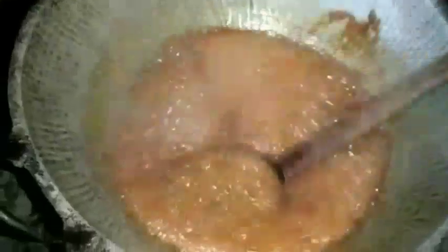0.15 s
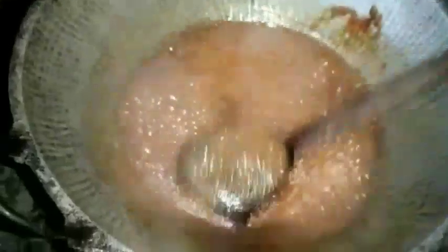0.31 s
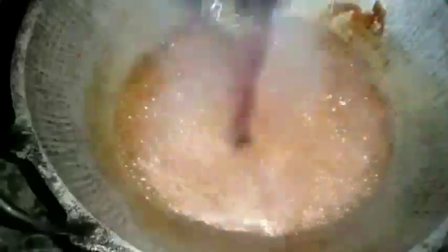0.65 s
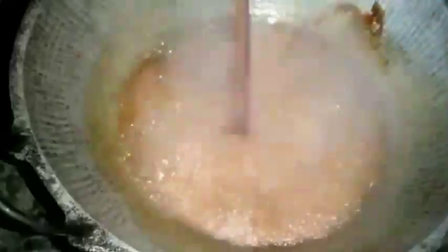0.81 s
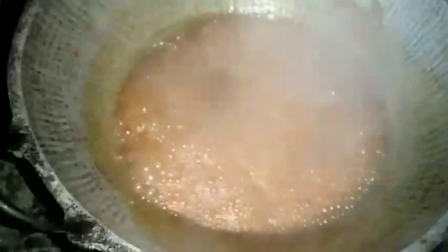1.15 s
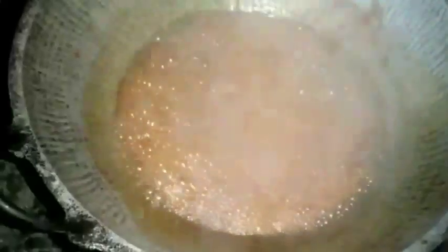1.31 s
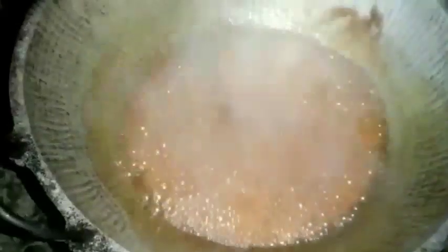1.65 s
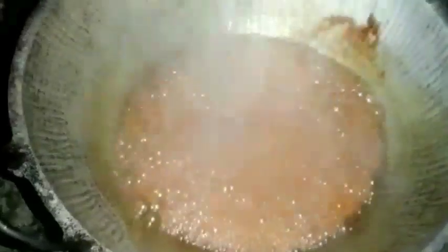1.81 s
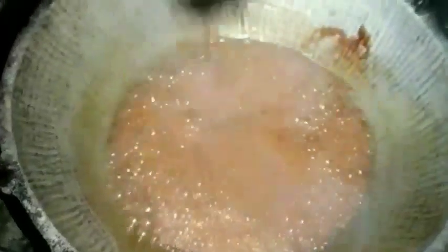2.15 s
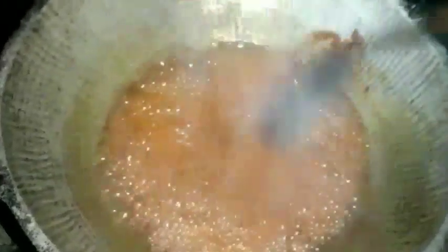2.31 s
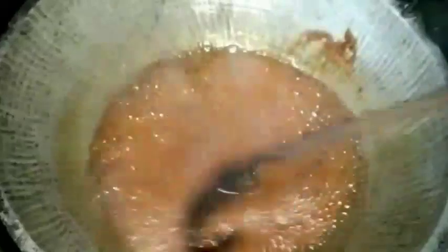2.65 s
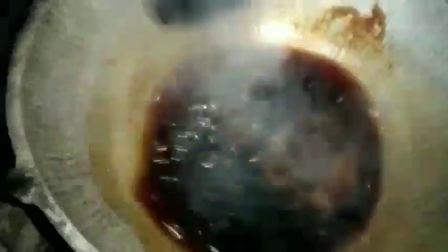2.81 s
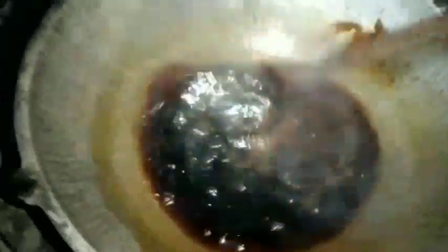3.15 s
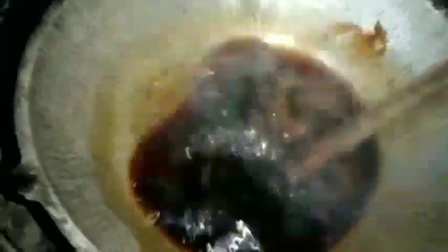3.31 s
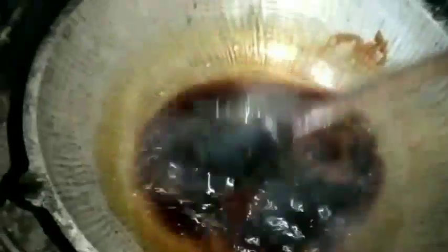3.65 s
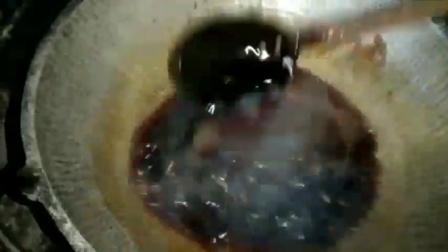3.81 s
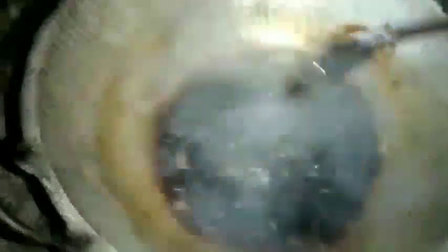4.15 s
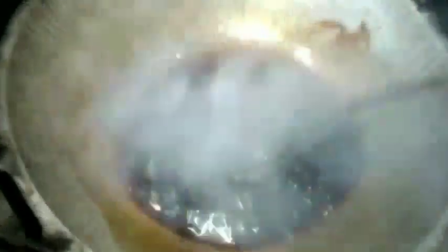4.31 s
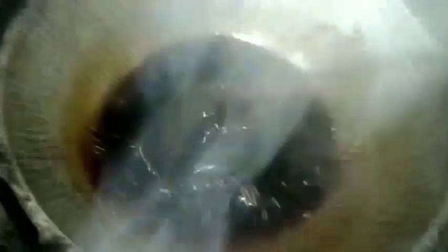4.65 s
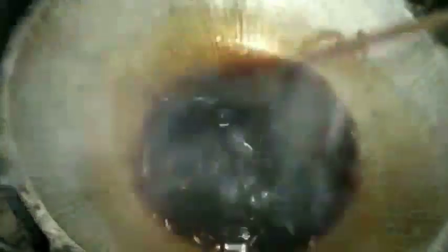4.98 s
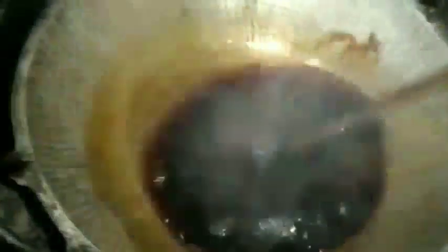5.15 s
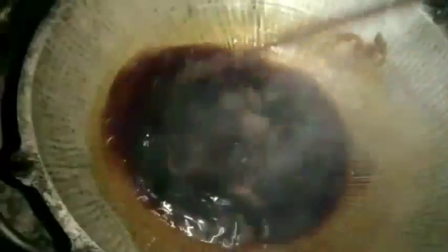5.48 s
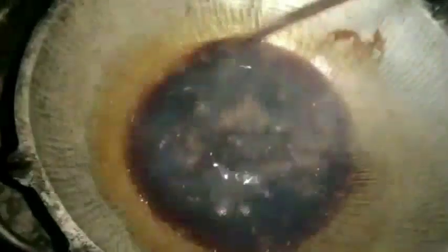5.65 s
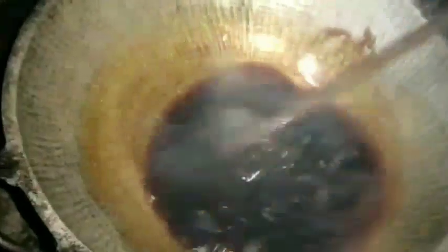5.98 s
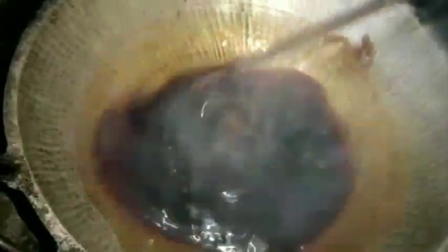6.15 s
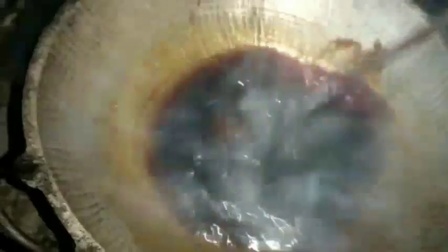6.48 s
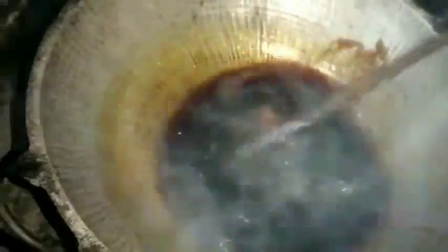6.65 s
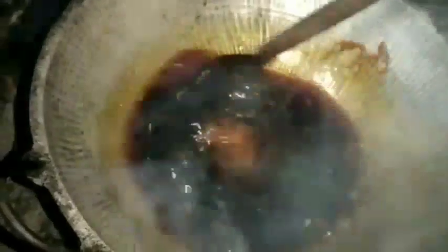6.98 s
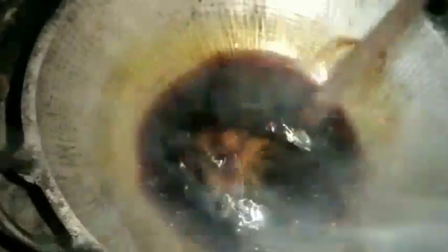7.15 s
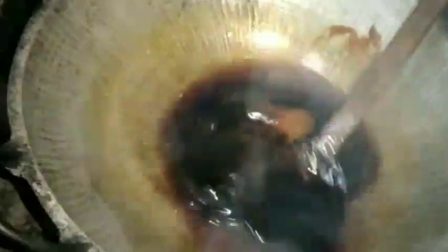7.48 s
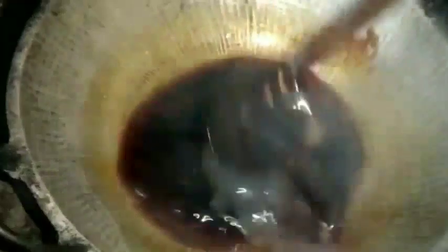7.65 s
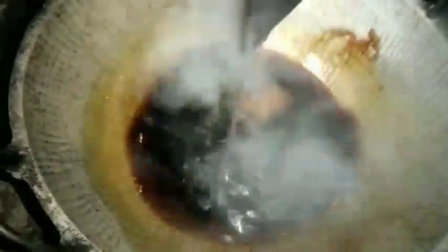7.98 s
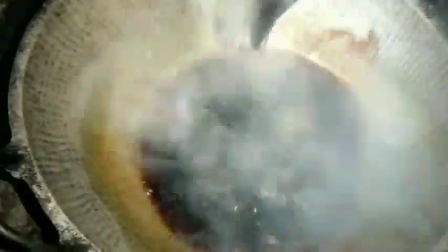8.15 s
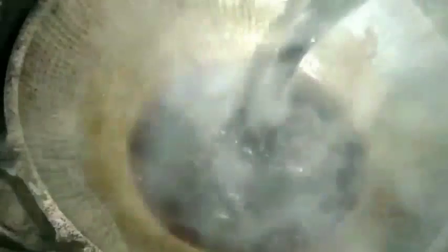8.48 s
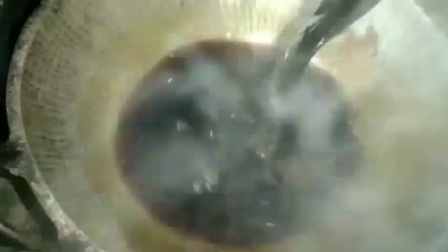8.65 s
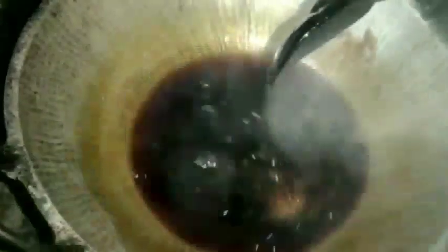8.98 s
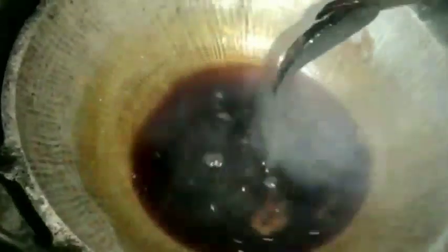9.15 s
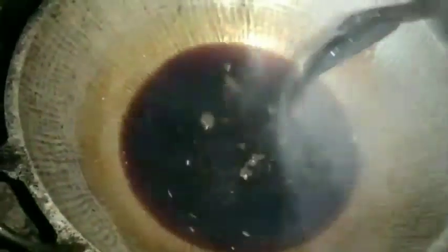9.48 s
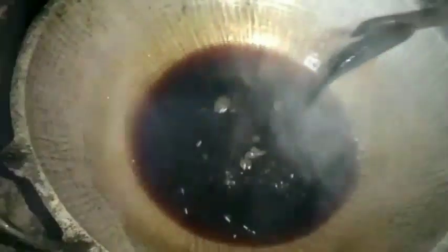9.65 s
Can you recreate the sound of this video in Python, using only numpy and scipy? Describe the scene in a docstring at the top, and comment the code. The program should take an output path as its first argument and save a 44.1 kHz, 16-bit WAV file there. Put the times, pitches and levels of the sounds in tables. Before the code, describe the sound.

Close in a small kitchen with short hard reflections, over a faint low rush. From 0 s a ladle rubs briefly round a steel wok while thick sugar foam fizzes and murmurs. At 0.8-1.4 s poured syrup gurgles and patters in droplets; the foam then seethes alone, thickening slightly. At 2.5 s a bright clank starts a scrape, cut off at 3 s by a tiny near-silent gap. From 3.1 s thin caramel: damped knocks, a splash with plops and steam hisses around 3.4-4.2 s, then a loud dull clank at 4.4 s. Stirring rasps and grates with sizzling, sputters and soft knocks until about 7.3 s, including a hard knock at 6.35 s. At 7.7-8.4 s liquid falls back in splashes, ringing plops and spitting; small hisses dwindle by 9 s. Near quiet follows, with a little drip at 9.25 s and faint metal ticks at 9.4 s.

```python
"""First comes foam: sugar seethes and fizzes in a hot steel wok in a small kitchen, many tiny bubbles bursting.
A metal ladle knocks, scrapes round the bowl in rubbing grains and pours syrup back in a gurgling thread.
Just before three seconds the scene cuts from the foam to a later moment, where the ladle stirs thin dark caramel,
which splashes, drips and sizzles as ringing bubbles and noise jets. The liquid damps the wok: every blow is short.
A low rush of noise lies underneath; hard walls answer 5 ms later, and the microphone rounds off the peaks."""
import sys
import numpy as np
from scipy import signal
from scipy.fft import rfft, irfft
from scipy.io import wavfile
from scipy.ndimage import uniform_filter1d, map_coordinates

SR = 44100
rng = np.random.default_rng(int(sys.argv[2]) if len(sys.argv) > 2 else 0)


def transcribe(u):
    """Save the signal u as a 16-bit wav file named by the first command-line argument.

    u: samples, shape (n,) or (channels, n), limited to [-1, 1]; the rate is SR.
    q: integer samples, one column per channel.
    """
    v = np.clip(np.atleast_2d(u).T, -1, 1)
    q = np.round(v * 32767).astype(np.int16)
    wavfile.write(sys.argv[1], SR, q)


N = 432180
CUT_S = 2.987  # from the foam to the thin caramel
TOP_HZ = 15500  # band limit of the microphone


def amp(db):
    """Decibels to gain."""
    return 10 ** (np.asarray(db) / 20)


def unit(x):
    """Scale to rms 1."""
    return x / np.sqrt(np.mean(x ** 2) + 1e-20)


def along(points, hz):
    """Read (f/Hz, value) points on a log frequency axis."""
    f, v = np.transpose(points)
    return np.interp(np.log(hz + 1), np.log(f + 1), v)


def add(track, s, x):
    """Mix x into the track at s seconds."""
    part = track[round(s * SR):][:len(x)]
    part += x[:len(part)]


def decay(t, t60):
    """Fall 60 dB in t60 seconds."""
    return np.exp(-np.log(1000) * t / t60)


def envelope(attack, held, release):
    """Rise over attack, stay until held after the start, then fall 60 dB in release."""
    t = np.arange(SR * 3 // 2) / SR
    return np.clip(t / attack, 0, 1) * decay(np.maximum(t - held, 0), release)


def swell(start, attack, held, release):
    """One envelope placed in the scene."""
    out = np.zeros(N)
    add(out, start, envelope(attack, held, release))
    return out


def wobble(rate):
    """A smooth random curve with rate knots a second."""
    knots = rng.standard_normal(int(N * rate / SR) + 4)
    return map_coordinates(knots, [np.arange(N) * rate / SR])


def colour(x, points, size=4096):
    """Causal (minimum-phase) filter with the gain of (f/Hz, level/dB) points."""
    gain = amp(along(points, np.fft.rfftfreq(size, 1 / SR)))
    # folding the cepstrum forward puts the whole response after the impulse
    cepstrum = irfft(np.log(gain))
    cepstrum[1:size // 2] *= 2
    cepstrum[size // 2 + 1:] = 0
    response = irfft(np.exp(rfft(cepstrum)))
    return signal.fftconvolve(x, response)[:len(x)]


def patchy(x, depth_db, wide_hz, lasting, size=512):
    """The level flickers at random in patches of time and frequency; rms 1."""
    hz, t, z = signal.stft(x, SR, nperseg=size)
    grid = np.meshgrid(hz / wide_hz, t / lasting, indexing="ij")
    field = map_coordinates(rng.standard_normal((256, 512)), grid, order=1, mode="mirror")
    patched = z * amp(depth_db * unit(field))
    return unit(signal.istft(patched, nperseg=size)[1][:N])


def grains(rate, spread_db):
    """Random tiny impulses of uneven size, rate a second on average; rms 1."""
    size = amp(spread_db * np.minimum(rng.standard_normal(N), 2))
    struck = rng.random(N) < rate / SR
    return unit(struck * size * rng.choice([-1, 1], N))


def excite(impulses, ring):
    """Every impulse sets off the same ring."""
    return signal.fftconvolve(impulses, ring)[:N]


def bubble(t, hz, cycles, rise):
    """A bubble rings for a few cycles; its pitch rises by the share rise as it surfaces."""
    life = cycles / hz
    return np.sin(2 * np.pi * hz * (t + rise * t * t / (2 * life))) * decay(t, life)


def blips(count, hz, spread, cycles, spread_db, until=N / SR):
    """Small bubbles surface at random, each with its own pitch (spread in log units) and size."""
    t = np.arange(SR // 40) / SR
    start = (rng.random((count, 1)) * until * SR).astype(int)
    pitch, size = np.clip(rng.standard_normal((2, count, 1)), -2, 1.8)
    soft_start = (1 - np.exp(-t * hz * 12 / cycles)) ** 2
    rings = amp(spread_db * size) * soft_start * bubble(t, hz * np.exp(spread * pitch), cycles, rise=0)
    places = (start + np.arange(len(t))).ravel()
    out = np.bincount(places, rings.ravel(), minlength=N)[:N]
    # rms 1 over the stretch that holds bubbles
    return unit(out) * np.sqrt(until * SR / N)


SPLUTTER_SPREAD = 0.22  # pitch spread in log units


def splutter(length, hz, cycles, count):
    """A clump of tiny bubbles about one pitch; rms 1 over its length, centred a quarter second in."""
    out, t = np.zeros(SR // 2), np.arange(SR // 30) / SR
    soft_start = (1 - np.exp(-t / .0004)) ** 2
    for when, pitch, size in np.clip(rng.standard_normal((count, 3)), -2, 2):
        ring = bubble(t, min(hz * np.exp(SPLUTTER_SPREAD * pitch), TOP_HZ), cycles, rise=0)
        add(out, max(1 / 4 + when * length / 2, 0), amp(3 * size) * soft_start * ring)
    return out / np.sqrt(np.sum(out ** 2) / (2 * length * SR))


# Colour of the low rush: (f/Hz, level/dB)
RUSH_COLOUR = [(25, -28), (50, -17), (95, -1), (150, 0), (210, -12), (325, 4.5), (410, -4.5), (510, -25),
               (1500, -28.5), (8000, -39), (15000, -45.5)]
DRONE_DB = -66  # rms before the sway and the fade
DRONE_FADE_S, DRONE_FADE_DB_PER_S = 8.11, 6.5  # the drone sinks towards the end


def drone():
    """Background: a low, unsteady rush of filtered noise under the wok."""
    sway = amp(1.8 * wobble(14))
    fading = np.maximum(np.arange(N) / SR - DRONE_FADE_S, 0)
    rush = unit(colour(rng.standard_normal(N), RUSH_COLOUR))
    return rush * amp(DRONE_DB - DRONE_FADE_DB_PER_S * fading) * sway


# Reverberation of the small kitchen: (f/Hz, t60/s)
ROOM_DECAY = [(200, 0.45), (1000, 0.087), (4000, 0.15), (12000, 0.2)]


def kitchen(x):
    """Hard walls answer 5 ms late with a short noise tail that decays at its own pace in each band."""
    hz, t, z = signal.stft(rng.standard_normal(SR // 2), SR, nperseg=256)
    dying = z * decay(t, along(ROOM_DECAY, hz)[:, None])
    tail = signal.istft(dying, SR, nperseg=256)[1]
    delayed = np.pad(x, (SR // 200, 0))
    return signal.fftconvolve(delayed, tail / np.linalg.norm(tail))[:N]


# Bubbles in thick foam: (f/Hz, level/dB)
SEETHE_COLOUR = [(30, -35.5), (85, -14), (160, 0.5), (340, 0.5), (720, -1), (1050, 1), (1450, 3),
                 (2200, -4.5), (2600, -18), (3100, -32), (8000, -54)]
SEETHE_DB, SEETHE_DB_PER_S = -60.5, 1.62  # level at the start before unevenness, growth as foam thickens
BLUB_HZ, BLUB_DB = 1323, -11  # single larger bubbles: middle pitch, level against the seething
POUR_SEETHE_DB, POUR_FIZZ_DB = -62, -65.5  # what the pour stirs up, before unevenness


def seething(clock, pour):
    """Thick foam murmurs: dense filtered bursts with single larger bubbles ringing among them."""
    gain = np.hypot(amp(SEETHE_DB + SEETHE_DB_PER_S * clock), amp(POUR_SEETHE_DB) * pour)
    seethe = patchy(colour(grains(rate=4000, spread_db=4), SEETHE_COLOUR), 1.5, wide_hz=140, lasting=.08)
    blubs = blips(count=330, hz=BLUB_HZ, spread=.36, cycles=24, spread_db=3.5, until=CUT_S)
    return (seethe + amp(BLUB_DB) * blubs) * gain * amp(0.41 * wobble(8.2))


# The finest bubbles: (f/Hz, level/dB)
FIZZ_COLOUR = [(2000, -36), (3300, -27.5), (3780, -0.5), (4150, -1), (4700, 2.5), (6000, 0.5), (7700, -5),
               (8800, -26.5), (15000, -22.5)]
FIZZ_DB, FIZZ_DB_PER_S = -70.5, -1  # level at the start before singing and unevenness, slow fall
SING_HZ, SING_DB = 3720, -5.5  # the fizz keeps one mode of the wok ringing; level against the fizz


def fizzing(clock, pour):
    """The finest bubbles hiss in flickering bands and keep one mode of the wok singing."""
    gain = np.hypot(amp(FIZZ_DB + FIZZ_DB_PER_S * clock), amp(POUR_FIZZ_DB) * pour)
    bursts = colour(grains(rate=4000, spread_db=3), FIZZ_COLOUR)
    fizz = patchy(bursts, depth_db=4.5, wide_hz=80, lasting=.04, size=1024)
    t = np.arange(SR // 20) / SR
    mode = np.sin(2 * np.pi * SING_HZ * t) * t * decay(t, .022)
    singing = unit(excite(rng.standard_normal(N), mode))
    return (fizz + amp(SING_DB) * singing) * gain * amp(2.5 * wobble(25.3))


# the thread of syrup poured back
POUR_S, POUR_ATTACK_S, POUR_HELD_S, POUR_RELEASE_S = 0.775, 0.087, 0.43, 0.37
GURGLE_HELD_S, GURGLE_DB = .3, -58.5  # the thread is thick enough to trap air
PATTER_S, PATTER_HELD_S, PATTER_DB = 0.99, 0.051, -52  # the thread breaks into droplets


def poured_thread():
    """The thread gurgles as trapped air rings at about 1 kHz, then patters as droplets."""
    t = np.arange(SR // 20) / SR
    cavity = np.sin(2 * np.pi * 1010 * t) * decay(t, .02)
    gurgle = unit(excite(grains(rate=160, spread_db=3), cavity))
    droplets = grains(rate=300, spread_db=5)
    patter = unit(colour(droplets, [(900, -20), (2000, 0), (7500, -2), (9000, -22)]))
    gurgling = swell(POUR_S, POUR_ATTACK_S, GURGLE_HELD_S, POUR_RELEASE_S)
    pattering = swell(PATTER_S, POUR_ATTACK_S, PATTER_HELD_S, POUR_RELEASE_S)
    return amp(GURGLE_DB) * gurgle * gurgling + amp(PATTER_DB) * patter * pattering


# fine blisters multiply as the foam heats: middle pitch, level at the start, growth
BLISTER_HZ, BLISTER_DB, BLISTER_DB_PER_S = 2710, -86.5, 8


def foam():
    """Many small bubbles burst in the thick sugar; the poured thread sounds in it and stirs it up."""
    clock = np.arange(N) / SR
    pour = swell(POUR_S, POUR_ATTACK_S, POUR_HELD_S, POUR_RELEASE_S)
    blisters = blips(count=700, hz=BLISTER_HZ, spread=.22, cycles=70, spread_db=3.5, until=CUT_S)
    growing = blisters * amp(BLISTER_DB + BLISTER_DB_PER_S * clock)
    return seething(clock, pour) + fizzing(clock, pour) + growing + poured_thread()


# Laps up the wall, levels before the mix of each layer: (start t/s, held t/s, slosh level/dB, spray level/dB)
WALL_LAPS = [(3.45, 0.077, -55, -73.5), (3.749, 0.13, -57, -66), (4.132, 0.12, -57, -70.5),
             (7.834, 0.026, -49.5, -57), (7.93, 0.22, -61.5, -69), (8.206, 0.04, -63.5, -62.5),
             (8.37, 0.061, -56.5, -90), (8.49, 0.073, -81.5, -67.5), (8.66, 0.033, -75, -72),
             (8.769, 0.025, -61, -60.5)]
# Caramel lapping: (f/Hz, level/dB)
SLOSH_COLOUR = [(400, -19), (800, -1), (1000, -31.5), (1400, 18.5), (2300, 20.5), (3000, 17.5), (5000, -31)]
# Caramel spitting: (f/Hz, level/dB)
SPRAY_COLOUR = [(2800, -29.5), (4000, -1), (6000, -4), (8000, 9), (9500, -7.5), (11500, 5.5),
                (15000, -11.5)]
LAP_ATTACK_S, LAP_RELEASE_S = 0.015, 0.26  # a wave runs up quickly
POP_HZ, POP_DB = 3900, -19.5  # small bubbles popping on the hot wall: middle pitch, mix level in the spray


def wash():
    """Thin caramel laps up the hot wall, where it bubbles, pops and spits in flurries."""
    slosh, spray = np.zeros((2, N))
    for s, held, slosh_db, spray_db in WALL_LAPS:
        lap = swell(s, LAP_ATTACK_S, held, LAP_RELEASE_S)
        slosh += amp(slosh_db) * lap
        spray += amp(spray_db) * lap
    waves = colour(grains(rate=900, spread_db=3), SLOSH_COLOUR)
    lapping = patchy(waves, depth_db=6.5, wide_hz=110, lasting=.07, size=1024)
    bubbles = blips(count=900, hz=1600, spread=.4, cycles=30, spread_db=4)
    flurries = grains(rate=450, spread_db=4) * amp(3.5 * wobble(70))
    spits = patchy(colour(flurries, SPRAY_COLOUR), depth_db=5, wide_hz=220, lasting=.06)
    pops = blips(count=700, hz=POP_HZ, spread=.35, cycles=16, spread_db=5)
    wet = amp(-9.0) * lapping + amp(-18.5) * bubbles
    hot = amp(-4.5) * spits + amp(POP_DB) * pops
    return slosh * wet + spray * hot


# Steam squeezing out from under wet patches, levels before the puffing:
# (peak t/s, rise t/s, fall t/s, f/Hz, glide/Hz per s, width/Hz, level/dB)
STEAM_JETS = [(3.496, 0.061, 0.1, 3830, 299, 434, -65.5), (3.53, 0.086, 0.25, 2835, 3, 500, -65.5),
              (3.749, 0.026, 0.07, 2275, 0, 1195, -62), (3.769, 0.061, 0.18, 2800, -300, 377, -75),
              (4.121, 0.041, 0.064, 2730, 2, 200, -71), (4.255, 0.034, 0.14, 2930, 292, 114, -62.5),
              (4.722, 0.075, 0.15, 3405, 9, 1230, -56.5), (6.019, 0.068, 0.19, 3280, 8.5, 1530, -55),
              (7.299, 0.038, 0.15, 3950, -2, 920, -60.5), (7.545, 0.029, 0.041, 2653, 1508, 171, -61),
              (7.61, 0.037, 0.075, 2680, 402, 128, -58.5), (7.738, 0.039, .09, 2780, 0, 222, -74),
              (8.335, .015, 0.023, 3170, 0, 258, -71), (8.38, 0.04, 0.033, 3840, -1500, 500, -74),
              (8.445, .025, 0.066, 3120, -900, 342, -66), (8.521, 0.059, 0.087, 3000, -900, 400, -64.5),
              (8.54, 0.01, .025, 4240, 11.5, 602, -69.5), (8.609, .012, 0.015, 4200, 0, 600, -80),
              (8.649, 0.015, 0.032, 3000, -900, 298, -68), (8.68, 0.015, 0.028, 2194, -1, 450, -62.5),
              (8.77, 0.048, 0.1, 2280, 17, 420, -64.5), (8.95, .03, 0.058, 3540, 0, 590, -89.5)]
JET_OVERTONE_DB = -23  # the octave above a jet, before its weighting by width
PUFF_DB, PUFFS_PER_S = 2.2, 28  # depth and knot rate of the puffing


def hisses():
    """Each jet of steam sputters and puffs as it swells and dies, in one band; the narrowest squeak."""
    out, t = np.zeros(N), np.arange(-SR // 4, SR // 2) / SR
    for s, rise, fall, hz, glide, width_hz, db in STEAM_JETS:
        sputter = rng.standard_normal((2, len(t))) * (rng.random(len(t)) < 900 / SR)
        band = signal.butter(3, width_hz / 2, fs=SR, output="sos")
        flutter = unit(signal.sosfilt(band, sputter))
        phase = 2 * np.pi * (hz + glide * t / 2) * t
        jet = flutter[0] * np.sin(phase) + flutter[1] * np.cos(phase)
        # narrow jets have a stronger octave
        octave_gain = amp(JET_OVERTONE_DB) * np.interp(width_hz, [150, 400], [2, .5])
        overtone = octave_gain * flutter[0] * np.sin(2 * phase)
        shape = np.exp(-(t / np.where(t < 0, rise, fall)) ** 2)
        add(out, s + t[0], amp(db) * (jet + overtone) * shape)
    return out * amp(PUFF_DB * wobble(PUFFS_PER_S))


# Single large bubbles, levels before attack and decay: (t/s, f/Hz, level/dB)
LARGE_BUBBLES = [(3.529, 1710, -55), (3.612, 1500, -56), (3.631, 1240, -68), (3.78, 1420, -49),
                 (3.932, 1510, -57), (4.01, 1590, -69), (4.044, 2120, -51.5), (4.112, 1290, -56.5),
                 (4.076, 2720, -48), (4.11, 786, -58), (7.61, 1350, -55.5), (7.674, 1850, -64),
                 (7.75, 2030, -49.5), (7.806, 1010, -56), (7.836, 1260, -37.5), (7.955, 620, -65),
                 (8.019, 466, -63), (8.101, 391, -52), (7.939, 1280, -48.5), (8.168, 2350, -36.5),
                 (8.222, 1490, -64), (8.274, 820, -62), (8.352, 710, -68), (8.336, 1450, -62),
                 (8.679, 1435, -56.5), (8.84, 775, -61), (9.245, 2730, -63), (9.292, 2730, -58)]
BUBBLE_CYCLES, BUBBLE_RISE, BUBBLE_ATTACK_S = 58, .012, 0.0021  # ring length, pitch-rise share, soft start


def plops():
    """Now and then one large bubble surfaces in the thin caramel and rings softly."""
    out, t = np.zeros(N), np.arange(SR // 8) / SR
    soft_start = 1 - np.exp(-t / BUBBLE_ATTACK_S)
    for s, hz, db in LARGE_BUBBLES:
        add(out, s, amp(db) * soft_start * bubble(t, hz, BUBBLE_CYCLES, BUBBLE_RISE))
    return out


# Wet caramel spluttering in clumps of tiny bubbles of like size: (centre t/s, length t/s, f/Hz, rms level/dB)
SPLUTTER_CLUMPS = [(3.343, .004, 1780, -51.5), (3.394, 0.015, 2160, -58), (3.709, .003, 2090, -55.5),
                   (3.781, .008, 1890, -63), (4.188, 0.03, 1970, -67), (5.051, 0.027, 945, -58),
                   (5.133, 0.02, 1560, -51), (5.21, 0.034, 1310, -71), (5.395, 0.052, 1270, -61),
                   (5.569, 0.018, 2840, -55), (5.859, 0.023, 1550, -61), (6.27, 0.026, 1200, -67),
                   (6.82, .008, 7920, -68.5), (6.95, 0.035, 6200, -59), (7.162, 0.021, 1460, -48),
                   (7.21, 0.013, 1580, -53), (7.25, 0.015, 3880, -51.5), (7.359, 0.026, 1400, -56),
                   (7.756, 0.0067, 2350, -73.5), (7.818, 0.015, 2880, -67.5), (7.853, 0.011, 1430, -58),
                   (7.948, 0.019, 1430, -59.5), (7.958, .008, 3460, -61), (7.99, .02, 4200, -70),
                   (8.05, 0.015, 1510, -63), (8.062, 0.0096, 4300, -66), (8.087, 0.01, 4570, -73),
                   (8.104, 0.023, 794, -75), (8.168, 0.0039, 2280, -53), (8.393, 0.012, 1880, -63),
                   (8.689, 0.012, 2100, -75), (8.789, 0.023, 2750, -61), (8.801, 0.025, 4750, -67)]


def splutters():
    """Wet caramel meets hot steel and boils up for a moment, as a clump of ringing bubbles."""
    out = np.zeros(N)
    for s, length, hz, db in SPLUTTER_CLUMPS:
        add(out, s - 1 / 4, amp(db) * splutter(length, hz, cycles=20, count=45))
    return out


# Syrup drops and bursting bubbles, level before a 7.5 dB cut:
# (t/s, peak level/dB, brightness/dB per octave from 1500 to 6000 Hz, spray level/dB)
SYRUP_DROPS = [(0.883, -39.5, 3, -53), (1.008, -28, -8.5, -44), (1.034, -26, -0.5, -32),
               (1.051, -29, 7, -10), (1.091, -34.5, -2, -40), (1.132, -32, -5, -53), (1.355, -30.5, 8, -2),
               (2.245, -36, -14, 46), (2.977, -28, 8, -20), (3.341, -36, -26.5, -14),
               (3.385, -41.5, -19, -1), (3.709, -55, -10, -14), (3.793, -32.5, 48, -32.5),
               (3.837, -35.5, -6, -45), (3.872, -36.5, 14, -8), (6.965, -28, -3, -13),
               (6.978, -29, -5, -19), (7.299, -33, -10, -45), (7.418, -40, 14, -20),
               (7.84, -58, -7.5, -9.5), (7.85, -35.5, 18, -10), (7.926, -34, -3, -31),
               (7.942, -37.5, -17, -25), (7.953, -42, -12, -38), (8.017, -29.5, -12.5, 2),
               (8.031, -33.5, -11, 4), (8.065, -36, 6, -24), (8.076, -20.5, -2, -36), (8.123, -29.5, 9, 2),
               (8.145, -41, 4, -14), (8.15, -33, -2, -14), (8.168, -41, 8, -36), (8.178, -51, -3, -29),
               (8.374, -42, -19, -23), (9.247, -57, 6, 6)]
# A drop of middling size, its plop below and its snap above: (f/Hz, level/dB)
DROP_COLOUR = [(40, -29.5), (150, -2.5), (600, -1.5), (1200, -14.5), (2300, -0.5), (4000, 2.5), (8000, 6)]


def drops():
    """Each drop snaps on the surface, traps a few tiny bubbles and scatters spray in its own colour."""
    out, t = np.zeros(N), np.arange(SR // 12) / SR
    for s, db, brightness_db, spray_db in SYRUP_DROPS:
        drop = rng.standard_normal(len(t)) * (decay(t, .02) + .16 * decay(t, .08))
        for hz, size in [(1500, 0.98), (2300, 0.29), (5500, 0.46)]:
            pitch = hz * np.exp(.15 * rng.standard_normal())
            add(drop, rng.uniform(0, .0015), size * bubble(t, pitch, cycles=28, rise=.05))
        tone = []
        for hz, level in DROP_COLOUR:
            octaves = np.log2(np.clip(hz / 1500, 1, 4))
            tone.append((hz, level + brightness_db * octaves))
        top_db = tone[-1][1] + spray_db
        drop = colour(drop, tone + [(10500, top_db), (15000, top_db - 8.5)])
        add(out, s, amp(db - 7.5) * drop / np.abs(drop).max())
    return out


# The lifted ladle ticks softly against the rim, gain before its ring and scuff: (t/s, level/dB)
RIM_TICKS = [(9.3995, -61), (9.4065, -66)]
# The ladle's own ring, levels before a random scatter: (f/Hz, level/dB, t60/s)
LADLE_MODES = [(477, 9, 0.061), (752, -13.5, 0.14), (1280, 2.5, 0.063), (1600, 5, 0.037), (2760, -1, 0.045),
               (3610, 11.5, 0.031), (4620, -13, 0.095), (6180, -15, 0.047), (7150, -13, 0.062)]
TICK_ATTACK_S = 0.0015  # cushioned by syrup


def ticks():
    """The ladle grazes the rim and rings briefly by itself, its modes over a short scuff of noise."""
    out, t = np.zeros(N), np.arange(SR // 8) / SR
    scuff_colour = [(300, -6), (1500, 0), (4500, -4), (6000, -20), (12000, -35)]
    for s, db in RIM_TICKS:
        ring = 0
        for hz, level, t60 in LADLE_MODES:
            mode = np.sin(2 * np.pi * (hz * t + rng.random()))
            ring = ring + amp(level + rng.normal(0, 3.2)) * decay(t, t60) * mode
        scuff = unit(colour(rng.standard_normal(len(t)), scuff_colour)) * decay(t, .04)
        add(out, s, amp(db) * (1 - np.exp(-t / TICK_ATTACK_S)) * (ring + scuff))
    return out


# The wok with syrup in it, levels before scatter and colouring: (f/Hz, level/dB, t60/s)
WOK_MODES = [(234, -14, 0.12), (318.4, -1, 0.051), (384, -10, 0.11), (421, -1, 0.061), (610, 0.5, 0.013),
             (625, -20.5, 0.042), (1100, -14.5, 0.02), (1393, -16, 0.029), (1440, -17, 0.027),
             (2360, -6.5, 0.049), (3380, -14.5, 0.044), (3738, -3, 0.061), (4080, -17.5, 0.005),
             (4390, -5.5, 0.055), (4800, -9, 0.049), (5270, 0, 0.037), (5930, -8, 0.065),
             (6250, -9.5, 0.039), (7200, -8, 0.074), (7750, -8, 0.048), (8430, -26.5, 0.04)]


def wok_ring(scatter_db, detune, smear_hz, clatter, clatter_t60):
    """The wok's answer to one contact: its main modes over a dense noise-like cloud of short ones."""
    t = np.arange(SR // 5) / SR
    modes = 0
    scatter = rng.standard_normal((len(WOK_MODES), 2))
    for k, ((hz, db, t60), (size, shift)) in enumerate(zip(WOK_MODES, scatter)):
        upper = hz > 2000  # only these modes shift and blur
        blur = np.cumsum(rng.standard_normal(len(t))) * np.sqrt(2 * np.pi * abs(smear_hz) / SR)
        phase = 2 * np.pi * hz * (1 + detune * shift * upper) * t + blur * upper
        modes = modes + amp(db + scatter_db * size) * decay(t, t60) * np.sin(phase) * (-1) ** k
    return modes + clatter * decay(t, clatter_t60) * rng.standard_normal(len(t))


# Sweeps of the ladle round the bowl, levels before the mix of each layer: (start t/s, held t/s, release t/s,
# drumming level/dB, rasp level/dB, grit level/dB, treble level/dB against the grit)
SWEEPS = [(0.0, 0.057, .1, -42.5, -63, -53.5, 6), (0.03, 0.13, 0.35, -46, -50.5, -53, 9.5),
          (2.541, 0.23, 0.46, -44.5, -54, -56.5, 4.5), (2.70, 0.32, 0.52, -42, -48.5, -60, 12.5),
          (3.131, 0.08, 0.42, -45, -50.5, -57.5, 7.5), (3.391, 0.022, 0.63, -51.5, -56, -60.5, -11),
          (4.38, 0.43, 0.57, -45.5, -48.5, -55, 0), (4.68, 0.15, 1.2, -43, -47, -51.5, 0),
          (4.959, 0.31, 1.46, -43.5, -42, -57, 4), (5.29, .12, 2.3, -47.5, -55, -51.5, -6.5),
          (5.454, 0.22, 1.2, -48, -50, -54, 2), (5.718, 0.34, 1.9, -44, -42, -51, -1),
          (6.02, 0.17, 0.22, -49, -48, -59.5, 5), (6.204, 0.085, 0.14, -43.5, -42.5, -53, 1),
          (6.346, 0.019, 0.77, -45.5, -39, -46, -12.5), (6.449, 0.1, 1.7, -45, -49.5, -52, -3),
          (6.72, 0.25, .4, -50, -59, -53, -18), (6.828, 0.13, 0.53, -52.5, -53, -54.5, -5),
          (7.032, 0.033, 0.31, -45.5, -53, -48.5, -4.5), (7.121, 0.1, 0.043, -45.5, -51.5, -53.5, -4),
          (7.24, 0.17, 0.29, -57, -73, -54.5, -19)]
STROKE_ATTACK_S = 0.014  # the rim bites
LEAN_DB_PER_S = -4.5  # level slope while a sweep is held
TREMOR_DB = 1  # the hand's pressure is never even


def pressure():
    """Gains of drumming, rasp, grit and treble; where sweeps overlap the strongest one counts."""
    out = np.zeros((4, N))
    for s, held, release, drum_db, rasp_db, grit_db, treble_db in SWEEPS:
        push = envelope(STROKE_ATTACK_S, held, release)
        push = push * amp(LEAN_DB_PER_S * np.minimum(np.arange(len(push)) / SR, held))
        part = out[:, max(round(s * SR), 0):][:, :len(push)]
        gains = amp([drum_db, rasp_db, grit_db, grit_db + treble_db])
        part[:] = np.maximum(part, np.outer(gains, push))
    return out * amp(TREMOR_DB * wobble(14))


def drumming(slips, ring):
    """Big slips drum the whole bowl, mostly below 400 Hz."""
    bowl = colour(excite(slips, ring), [
        (25, -36), (60, -23.0), (100, -16.5), (190, 12.0), (250, -8.5), (330, 9), (450, -1.5),
        (620, -7.5), (1000, -29.0), (3000, -46.5), (12000, -76.5)])
    return patchy(bowl, depth_db=1.4, wide_hz=110, lasting=.07)


JOLT_DB = -16  # mix level of the jolts in the rasp


def rasping(slips):
    """The rim rasps on every slip and now and then jolts through the syrup."""
    rim = colour(slips, [
        (300, -35.5), (480, 13.5), (580, 11.5), (780, 2.5), (1000, -10.5), (1600, -22.0),
        (5000, -52.0), (12000, -80)])
    jolts = unit(colour(grains(rate=55, spread_db=3), [
        (100, -24), (300, -4), (700, 0), (1300, -3), (2200, -14), (6000, -34), (9000, -56), (14000, -75)]))
    return amp(-5.5) * unit(rim) + amp(JOLT_DB) * jolts


# Steel rubbing on steel: (f/Hz, level/dB)
RUB_COLOUR = [(500, -38.5), (850, -13), (1070, -2), (1250, 3.5), (1480, 1), (2300, -0.5), (3000, -7),
              (3700, -12), (4300, -4.5), (5400, -12), (7900, -12), (9000, -26.5), (12000, -22),
              (15500, -53)]


def rubbing(fine, ring):
    """Fine slips hiss on the steel and ring it; the colour shifts as the rim travels round the bowl."""
    rung = colour(excite(fine, ring), [(500, -27.5), (1000, 5.5), (3500, 6.5), (8000, -4.0), (10000, -17.0)])
    steel = unit(colour(fine, RUB_COLOUR)) + 0.15 * unit(rung)
    steel = patchy(steel, depth_db=4.2, wide_hz=120, lasting=.06, size=1024)
    return patchy(steel, depth_db=1.6, wide_hz=800, lasting=.11)


SPIT_HZ, SPIT_SPREAD = 2650, 0.6  # spitting under the moving ladle: middle pitch, spread in log units


def spitting(count):
    """Short dry splutters crowd into a sizzle, each with its own pitch and strength; higher ones softer."""
    out = np.zeros(N)
    draws = np.clip(rng.standard_normal((count, 2)), -1.6, 1.5)
    for s, (pitch, size) in zip(rng.uniform(0, N / SR, count), draws):
        spit = splutter(.035, SPIT_HZ * np.exp(SPIT_SPREAD * pitch), cycles=11, count=16)
        add(out, s, amp(3 * size - 2.5 * pitch) * spit)
    return unit(out)


# Syrup muffles the top of the sizzle: (f/Hz, level/dB)
FILM_COLOUR = [(7800, -2), (9200, -4), (15000, -9.5)]
# mix levels in the grit: hard catches of the rim, boiling (with its middle pitch), spitting
CATCH_DB, BOIL_HZ, BOIL_DB, SPIT_DB = -8, 1204, -6.5, -5


def scraping():
    """The ladle's rim catches and slips: big slips drum the bowl, fine ones hiss under a film of syrup."""
    drum, rasp, grit, treble = pressure()
    slips = unit(grains(rate=330, spread_db=5) + .5 * grains(rate=3000, spread_db=3))
    fine = unit(slips * .6 + grains(rate=6000, spread_db=3) * amp(1.6 * wobble(70)))
    ring = wok_ring(scatter_db=0, detune=0, smear_hz=40, clatter=.45, clatter_t60=.03)
    steel = rubbing(fine, ring)
    dull = signal.sosfiltfilt(signal.butter(2, 3000, fs=SR, output="sos"), steel)
    # caramel boils in bursts behind the rim
    boiling = blips(count=2200, hz=BOIL_HZ, spread=.45, cycles=8, spread_db=3.5)
    boil = unit(boiling * amp(2.5 * wobble(22)))
    # harder catches tick in the bowl
    catches = unit(colour(excite(grains(rate=90, spread_db=3.5), ring), [
        (200, -35.0), (420, -17.5), (600, -4.5), (1400, 3.5), (2400, -5.5), (3500, -9.5),
        (8000, -26.5), (10000, -49), (15000, -63)]))
    body = amp(-3.5) * dull + amp(CATCH_DB) * catches + amp(BOIL_DB) * boil
    sizzle = colour(amp(-1.0) * (steel - dull) + amp(SPIT_DB) * spitting(count=220), FILM_COLOUR)
    # the sizzle's colour flickers at random in narrow bands
    flickering = patchy(sizzle, depth_db=3.2, wide_hz=170, lasting=.055)
    sizzle = sizzle.std() * flickering * amp(1.2 * wobble(11))
    rubbed = amp(1.0) * (grit * body + treble * sizzle)
    return drum * drumming(slips, ring) + rasp * rasping(slips) + rubbed


def band_db(x, band):
    """Highest short-term level within a band."""
    part = signal.sosfilt(signal.butter(2, band, "band", fs=SR, output="sos"), x)
    return 10 * np.log10(uniform_filter1d(part ** 2, size=128).max())


# Ladle against wok, levels before a 15.5 dB cut; thud and ring are relative to the blow:
# (t/s, blow level/dB, thud level/dB, ring level/dB)
LADLE_BLOWS = [(0.031, -38.5, -10, 12.5), (0.091, -29.5, 1, -4.5), (2.509, -6.5, -6.5, -3.5),
               (2.777, -24.5, 3, -40), (3.126, -11.5, -5.5, -6), (3.138, -31, 0, 3),
               (3.406, -22, -5, -18.5), (3.732, -14.5, -13.5, -27.5), (4.152, -31, 2, -17.5),
               (4.361, -1, -12, -14.5), (4.415, -21.5, -10, -37), (4.978, -42.5, 15, 5),
               (5.089, -22, -4, -21), (5.229, -40, 21.5, -14.5), (5.502, -24.5, -8, -15),
               (5.735, -20, -3.5, -34), (5.752, -24.5, -7, -31), (5.817, -27, -1.5, -18),
               (6.35, -10.5, -5, -19.5), (6.355, -25.5, 10, -25.5), (6.366, -22, -8, -27),
               (6.37, -22.5, -5, -16.5), (6.394, -23.5, 4, -36), (6.463, -28, -7, -32), (7.043, -36, -7, 4),
               (7.064, -23.5, -0.5, -16), (7.164, -23.5, -29, -31), (7.243, -26.5, -2.5, -16)]
# Bands of thud, body, ring and edge: (low f/Hz, high f/Hz)
LEVEL_BANDS = [(200, 600), (700, 2800), (3000, 8000), (9000, 15000)]
EDGE_DB = -9  # the very top of a blow, against its ring
LOAD_DETUNE = 0.024  # syrup and ladle load the wok anew at each contact and shift its upper modes
MODE_SMEAR_HZ = 128  # moving syrup blurs the upper modes of a blow


def knocks():
    """Main source: the ladle lands on the steel; syrup between them makes the blow duller."""
    out, t = np.zeros(N), np.arange(SR // 5) / SR
    for s, db, thud_db, ring_db in LADLE_BLOWS:
        # a hard landing chatters on the steel; a cushioned one is mostly a single push
        chatter = np.interp(db, [-22, -15], [.5, 1]) * decay(t, 0.047) * rng.standard_normal(len(t))
        push_size = np.interp(ring_db, [-20, -15, -10], [22, 4, 3])
        push = push_size * (1 - t / .00028) * np.exp(-t / .00028)
        ring = wok_ring(2, LOAD_DETUNE, MODE_SMEAR_HZ, clatter=.4, clatter_t60=.07)
        blow = ring + 1.2 * chatter + push
        # gains that bring each band of this blow to its level
        wanted = db + np.array([thud_db, 0, ring_db, ring_db + EDGE_DB])
        thud, body, ringing, edge = wanted - [band_db(blow, band) for band in LEVEL_BANDS]
        blow = colour(blow, [
            (30, thud - 24), (90, thud - 8), (170, thud + 3), (420, thud + 1.1),
            (780, body - 5), (1100, body + 3), (1500, body + 2), (2150, body - 7),
            (3700, ringing + 0.5), (5600, ringing + 1), (7800, ringing - 1),
            (10000, edge), (15000, edge - 4)])
        add(out, s, amp(-15.5) * blow)
    return out


def scene():
    """Ladle, liquid and room; at the cut all but the drone is silent for 0.13 s, and the foam is gone."""
    t = np.arange(N) / SR
    blows = knocks() + ticks()
    strokes = scraping()
    liquid = drops() + plops() + splutters() + wash() + hisses()
    room = kitchen(amp(-13.0) * blows + amp(-10) * strokes + amp(-8) * liquid)
    playing = (t < CUT_S) | (t > CUT_S + .13)
    return drone() + foam() * (t < CUT_S) + (blows + strokes + liquid + room) * playing


CLIP_LEVEL = .26  # ceiling of the microphone before the band limit, full scale 1


def record(dry):
    """The microphone rounds off the hardest blows and cuts steeply above its band limit."""
    rounded = dry / (1 + (dry / CLIP_LEVEL) ** 4) ** (1 / 4)
    band_limit = signal.ellip(10, .1, 70, TOP_HZ, fs=SR, output="sos")
    return signal.sosfilt(band_limit, rounded).reshape(1, N)


dry = scene()
out = record(dry)
transcribe(out)
```